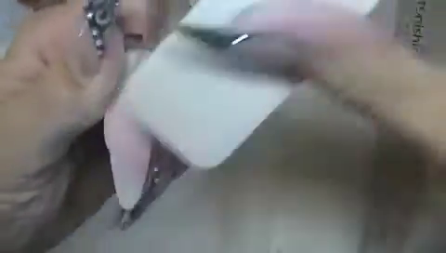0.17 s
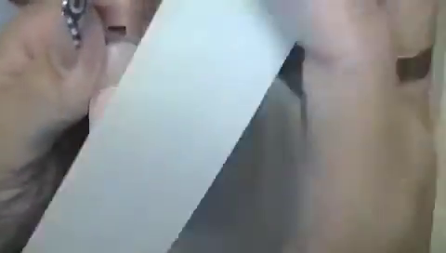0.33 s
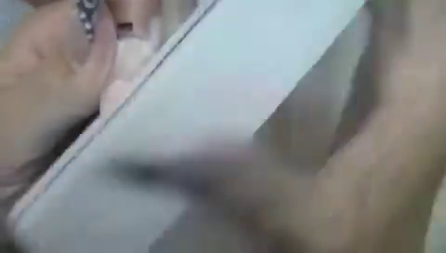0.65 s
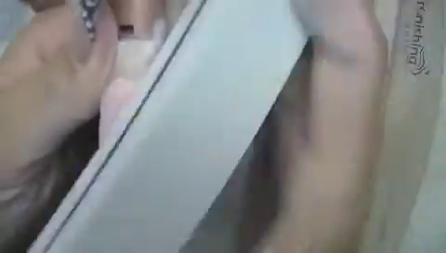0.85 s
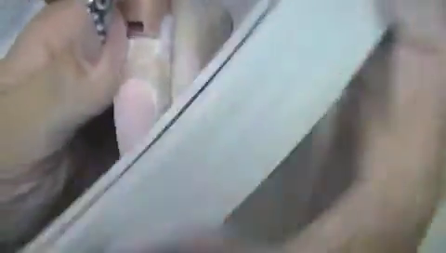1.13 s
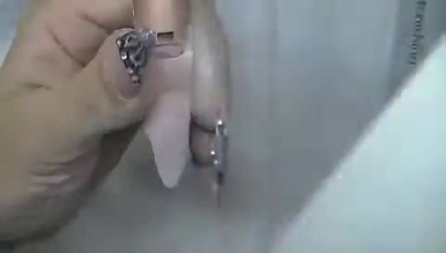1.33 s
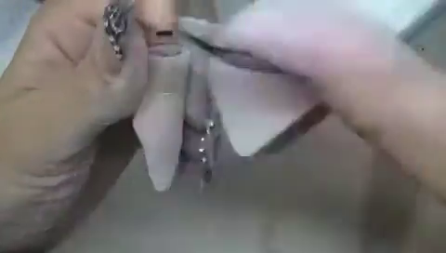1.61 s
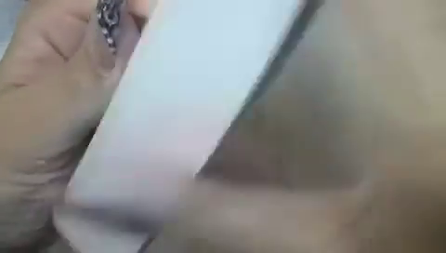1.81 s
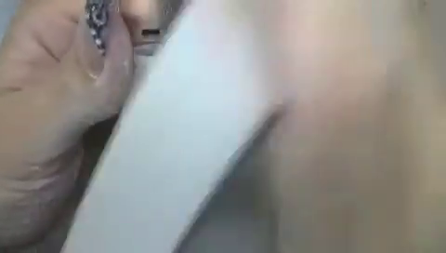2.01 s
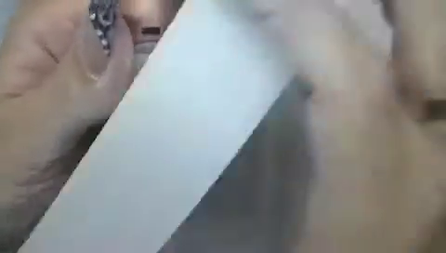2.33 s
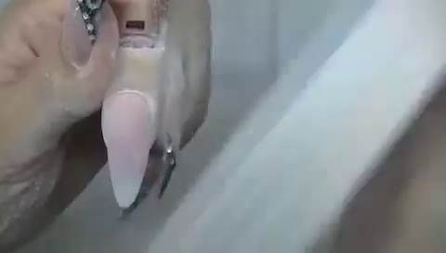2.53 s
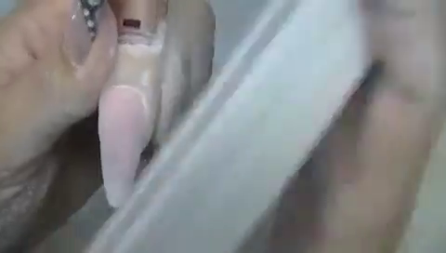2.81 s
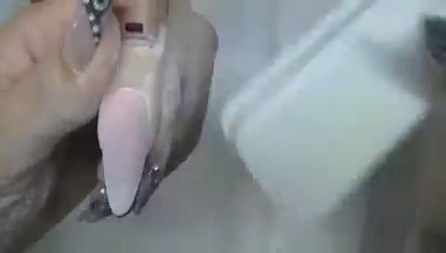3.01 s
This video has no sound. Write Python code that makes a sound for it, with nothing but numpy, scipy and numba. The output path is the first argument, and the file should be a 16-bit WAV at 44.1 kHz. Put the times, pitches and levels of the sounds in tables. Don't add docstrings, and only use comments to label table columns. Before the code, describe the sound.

A foam buffer block scratches a long acrylic nail, very close. Five hissy, gritty strokes of about 0.12 seconds start near 0.1, 0.4, 0.65, 0.9 and 1.15 s, the first strongest, with faint return drags. After a short pause and a tick at 1.5 s, six mostly lighter strokes follow until 3.0 s. Soft bumps mark landings; sharp clicks near 2.0 and 2.75 s. Quiet room hum.

```python
import sys
import numpy as np
from scipy import signal
from scipy.io import wavfile
from numba import njit

SR = 44100
rng = np.random.default_rng(int(sys.argv[2]) if len(sys.argv) > 2 else 0)


def decibels_to_gain(level_db):
    exponent = np.asarray(level_db, float) / 20
    return 10 ** exponent


def store_wav(level_fs):
    pcm = np.round(np.clip(np.atleast_2d(level_fs), -1, 1) * 32767)
    wavfile.write(sys.argv[1], SR, pcm.T.astype(np.int16))


N = 138915
RINGING_SHARE = 0.4


def rms_one(x):
    return x / np.sqrt(np.mean(x ** 2) + 1e-20)


def drift(rate_hz):
    r = np.exp(-2 * np.pi * rate_hz / SR)
    wander = signal.lfilter([1], [1, -2 * r, r * r], rng.standard_normal(N + SR))
    return rms_one(wander[SR:])


def butter(x, order, hz, kind="low"):
    return signal.sosfilt(signal.butter(order, hz, kind, fs=SR, output="sos"), x)


def resonance(x, hz, width_hz):
    r = np.exp(-np.pi * width_hz / SR)
    poles = [1, -2 * r * np.cos(2 * np.pi * hz / SR), r * r]
    return signal.lfilter(np.array([1, 0, -1]) * (1 - r * r) / 2, poles, x)


@njit
def moving_resonance(x, turn, r):
    y = np.zeros(len(x))
    for i in range(2, len(x)):
        y[i] = x[i] - x[i - 2] + 2 * r * np.cos(turn[i]) * y[i - 1] - r * r * y[i - 2]
    return y


def coloured(x, spectrum, patchy_db):
    hz, db = np.transpose(spectrum)
    edges_hz = 25 * 2 ** np.arange(0, 9.6, 1 / 3)
    out = 0
    for k, (low, high) in enumerate(zip(edges_hz, edges_hz[1:])):
        level_db = np.interp(np.log(np.sqrt(low * high)), np.log(hz), db)
        if level_db > -60:
            band = butter(x, 2, [low, high], "band")
            out = out + decibels_to_gain(level_db + patchy_db * drift(15.6)) * band * (-1) ** k
    return rms_one(out)


def scratch():
    grit_gain, nail_gain, block_hz, block_share = pressure()
    surface = grit_hiss(grit_gain) + block_share * block(block_hz)
    surface = surface / np.sqrt(1 + block_share ** 2)
    catch = grains(RINGING_SHARE)
    return grit_gain * surface + nail_gain * (nail_ring(catch) + finger(catch))


def pressure():
    # start/s, end/s, scratch at start/dB, scratch at end/dB, attack/s
    strokes = [(.115, .252, -20, -34, 0.033), (.382, .511, -29.5, -26, 0.0066),
               (.650, .800, -30, -33.5, 0.013), (.910, 1.030, -29, -25, 0.008),
               (1.169, 1.280, -29.5, -29, 0.0034), (1.531, 1.655, -28, -30, 0.00047),
               (1.803, 1.959, -30.5, -26, 0.0058), (2.090, 2.231, -32.5, -33.5, 0.0016),
               (2.369, 2.492, -35.5, -38, 0.0037), (2.638, 2.7495, -33.5, -28.5, 0.00143),
               (2.896, 3.0095, -34.5, -32.5, 0.00244)]
    # nail share at start/dB, at end/dB, block f at start/Hz, at end/Hz, block share/dB
    travel = [(-0.5, -10, 5760, 5100, 0), (3.5, -11.5, 5840, 4500, 0), (4, -13.5, 5970, 4360, 1),
              (5, -29, 5300, 5080, 0), (-0.5, -7.5, 6640, 4800, 0.5), (-8.5, -13, 4750, 3500, -5),
              (-11.5, -12.5, 4340, 4070, 0.5), (-20, -25, 6400, 4560, -7), (-8, -26.5, 4900, 5900, -7),
              (-3, -26, 6280, 4900, -4), (8, -26, 6160, 4650, -1)]
    # t/s, half width/s, scratch level/dB, nail level/dB
    surges = [(0.157, 0.015, -27.5, -21), (0.23, 0.0066, -28.5, -59), (0.433, 0.015, -22.5, -17.5),
              (.505, 0.004, -45, -52), (0.721, 0.04, -23.5, -36.5), (0.771, 0.0056, -26.5, -54),
              (0.955, 0.025, -26.5, -26), (1.024, 0.0032, -29, -59), (1.233, 0.023, -24.5, -45),
              (1.521, 0.0038, -41.5, -40), (1.644, 0.0051, -40, -53), (1.813, 0.0034, -30, -56),
              (1.953, 0.0027, -47, -28.5), (1.984, 0.013, -39, -39), (2.167, 0.034, -29.5, -53),
              (2.225, 0.0027, -31, -37), (2.438, 0.032, -29.5, -47), (2.69, 0.023, -36, -36.5),
              (2.765, 0.016, -37, -59), (2.937, 0.038, -31.5, -37.5), (3.008, 0.002, -30.5, -60),
              (3.015, 0.0048, -38, -64)]
    # start/s, level/dB, steady/s, fade to -60 dB/s (sign ignored)
    returns = [(0, -47.5, 0.011, 0.27), (.252, -45, 0.026, 0.3), (0.512, -39, 0.0048, 0.32),
               (.800, -45, 0.0089, 0.57), (1.031, -35.5, 0.0045, 0.14), (1.036, -46, 0.0091, 0.5),
               (1.282, -44, 0.061, -0.28), (1.34, -61, 0.027, -0.4), (1.657, -45.5, 0.015, 0.28),
               (2.001, -47.5, 0.0094, 0.34), (2.231, -47.5, 0.012, 0.45), (2.495, -52.5, 0.029, 0.25),
               (2.782, -56, 0.051, 0.1), (3.022, -52, 0.076, 0.2)]
    release_s, return_nail_db = 0.0016, -6.5
    return_block_hz, return_after_s = 4187, 0.026
    t = np.arange(N) / SR
    grit, nail = np.zeros(N), np.zeros(N)
    path = [(0, return_block_hz)]

    for (start, end, db0, db1, attack), (share0, share1, hz0, hz1, _) in zip(strokes, travel):
        along = np.clip((t - start) / (end - start), 0, 1)
        touch = np.clip((t - start) / attack, 0, 1) * decibels_to_gain(db0 + (db1 - db0) * along)
        touch = touch * np.exp(-np.maximum(t - end, 0) / release_s)
        grit = grit + touch ** 2
        nail = nail + (touch * decibels_to_gain(share0 + (share1 - share0) * along)) ** 2
        path += [(start - release_s, return_block_hz), (start, hz0)]
        path += [(end, hz1), (end + return_after_s, return_block_hz)]

    for s, half, grit_db, nail_db in surges:
        landing = max(row[0] for row in strokes if row[0] < s)
        bell = np.exp(-((t - s) / half) ** 2) * (t >= landing)
        grit = grit + bell * decibels_to_gain(2 * grit_db)
        nail = nail + bell * decibels_to_gain(2 * nail_db)

    for s, db, steady, fade in returns:
        drag = (t >= s) * decibels_to_gain(2 * db - 120 * np.maximum(t - s - steady, 0) / abs(fade))
        grit = grit + drag
        nail = nail + drag * decibels_to_gain(2 * return_nail_db)

    block_hz = np.interp(t, *np.transpose(path))
    turns_s = np.array(strokes)[:, :2].ravel()
    block_share_db = np.interp(t, turns_s, np.repeat(np.array(travel)[:, 4], 2))
    return np.sqrt(grit), np.sqrt(nail), block_hz, decibels_to_gain(block_share_db)


def grains(share=1):
    per_s, spread_db, chatter_db, chatter_hz = 13000, 2.7, 1.2, 150
    sizes = decibels_to_gain(spread_db * np.minimum(rng.exponential(1, N), 5)) * rng.choice([-1, 1], N)
    caught = rng.random(N) < share * per_s / SR
    return rms_one(sizes * caught * decibels_to_gain(chatter_db * drift(chatter_hz)))


def grit_hiss(grit_gain):
    # f/Hz, level/dB
    grit = [(1500, -10), (2500, -6), (3700, -0.5), (4700, 0), (7000, -4.5), (10300, -6.5), (14100, -21),
            (16200, -42.5)]
    reference_db, brightening, bright_from_hz = -78, 0.078, 11800
    hiss = coloured(grains(), grit, patchy_db=2.0)
    dull = butter(hiss, 2, bright_from_hz)
    bright = (hiss - dull) * (grit_gain / decibels_to_gain(reference_db)) ** brightening
    return rms_one(dull + bright)


def block(block_hz):
    # f/Hz, width/Hz, level/dB
    modes = [(4820, 170, -11.5), (5470, 51, -36), (5640, 65, -7.5), (6220, 100, -43)]
    hump_width_hz, mode_db, patchy_db = 1500, 6, 1.5
    catch = grains(RINGING_SHARE) * decibels_to_gain(patchy_db * drift(30.0))
    struck = catch + sum(decibels_to_gain(db + mode_db) * resonance(catch, hz, width) for hz, width, db in modes)
    turn, r = 2 * np.pi * block_hz / SR, np.exp(-np.pi * hump_width_hz / SR)
    return rms_one(moving_resonance(moving_resonance(struck, turn, r), turn, r))


def nail_ring(catch):
    # f/Hz, width/Hz, level/dB
    modes = [(1200, 150, -8), (1560, 80, -12), (2070, 230, -2), (2760, 200, -6), (3150, 160, 0),
             (3420, 260, -4)]
    spread, bed_db, gap_hz = 0.9, -14, 2400
    ring = 0
    for k, (hz, width_hz, db) in enumerate(modes):
        sign = (-1) ** (k + (hz > gap_hz))
        ring = ring + sign * decibels_to_gain(db + 2.0 * drift(14.5)) * resonance(catch, hz, spread * width_hz)
    bed = butter(catch[::-1], 3, [950, 3600], "band")
    return rms_one(rms_one(ring) + decibels_to_gain(bed_db) * rms_one(bed))


def finger(catch):
    hz, width_hz, level_db = 320, 220, -24
    return decibels_to_gain(level_db) * rms_one(resonance(resonance(catch, hz, width_hz), hz, width_hz))


def bites():
    # t/s, half width/s, level/dB, f/Hz
    bite_events = [(.145, 0.0037, -21, 2040), (0.153, 0.0012, -21, 3480), (.157, 0.0054, -22, 5760),
                   (.160, 0.0045, -18, 3250), (.176, 0.0025, -24, 3000), (.236, .003, -25, 4600),
                   (0.248, .003, -33, 4120), (.430, 0.009, -23.5, 2690), (0.444, 0.0015, -22, 3140),
                   (0.467, 0.0082, -25, 5750), (.507, .003, -34, 4450), (0.692, 0.012, -28, 2870),
                   (.772, 0.0017, -19.5, 4500), (.79, 0.0045, -35, 3250), (.925, 0.015, -30.5, 2980),
                   (1.025, 0.0031, -21, 4340), (1.022, 0.0027, -24, 5560), (.935, 0.0046, -28, 2070),
                   (0.966, 0.01, -27, 5700), (1.235, 0.0095, -26.5, 4190), (1.225, .006, -29, 6900),
                   (1.533, .0012, -31, 4800), (1.554, .0015, -30, 2900), (1.645, 0.0087, -28.5, 4300),
                   (1.812, 0.0043, -32.5, 2930), (1.985, 0.0043, -35, 4200), (1.954, 0.0024, -25, 3860),
                   (1.957, 0.00076, -26, 3300), (2.228, 0.0015, -27, 3170), (2.215, .008, -31, 4030),
                   (2.422, 0.0035, -31, 3220), (2.484, 0.0038, -31, 4000), (2.486, 0.0045, -34.5, 4700),
                   (2.68, 0.0093, -38.5, 2150), (2.757, .005, -36, 4100), (2.779, 0.0017, -40, 4020),
                   (2.82, 0.022, -53.5, 4900), (2.908, 0.0037, -35, 3250), (2.941, 0.0057, -41, 3130),
                   (2.94, 0.012, -39, 2230), (3.006, 0.0022, -30.5, 4300)]
    width_hz = 260
    out, t = np.zeros(N + SR), np.arange(-SR // 20, SR // 20) / SR
    for s, half, db, hz in bite_events:
        tone = rms_one(resonance(rng.standard_normal(len(t)), hz, width_hz))
        out[int((s + t[0]) * SR):][:len(t)] += decibels_to_gain(db) * tone * np.exp(-(t / half) ** 2 / 2)
    return out[:N]


def taps():
    # t/s, peak level/dB, scuff length/s, tip resonance f/Hz
    tap_events = [(0.893, -19, 0.011, 4400), (1.152, -19.5, 0.0045, 5300), (1.4125, -26.5, 0.0047, 1300),
                  (1.5016, -12.5, 0.0015, 3600), (1.5017, -23.5, 0.00086, 1510),
                  (1.978, -10.5, 0.00097, 3960), (1.9993, -3.5, 0.0009, 3900), (2.637, -16, 0.00067, 1510),
                  (2.746, -8, 0.0011, 4930), (2.782, -35.5, 0.0024, 4500), (2.895, -25, 0.00084, 1820),
                  (3.001, -19, 0.0022, 4400)]
    width_hz, softness, scuff_db = 800, 2.3, -12
    out, t = np.zeros(N + SR), np.arange(SR // 20) / SR
    for s, db, length, hz in tap_events:
        scuff = decibels_to_gain(scuff_db) * rng.standard_normal(len(t)) * np.exp(-t / length)
        hit = decibels_to_gain(db + 10.5) * ((t == 0) + scuff)
        tick = resonance(hit, hz, width_hz) + 0.2 * hit
        out[int(s * SR):][:len(t)] += butter(tick, 2, softness * hz)
    return out[:N]


def bumps():
    # t/s, peak level/dB, f/Hz
    bump_events = [(0.122, -25.5, 300), (0.16, -36, 93), (0.251, -40, 93), (.382, -21, 298),
                   (.503, -27.5, 290), (.650, -19.5, 300), (.893, -25, 300), (1.152, -29.5, 243),
                   (1.4121, -33.5, 300), (1.532, -28, 218), (1.656, -40, 76.5), (1.806, -33, 298),
                   (1.951, -29.5, 116), (1.994, -37, 75), (2.091, -28.5, 262), (2.222, -28.5, 148),
                   (2.370, -26.5, 295), (2.488, -37, 91), (2.638, -17, 386), (2.746, -26.5, 350),
                   (2.762, -35.5, 139), (2.896, -21.5, 296), (3.009, -29.5, 240)]
    cycles, low_hz, edge_hz = 2.02, 54, 18000
    out, t = np.zeros(N + SR), np.arange(SR // 10) / SR
    for s, db, hz in bump_events:
        swing = np.cos(2 * np.pi * hz * t - 0.8) * decibels_to_gain(-60 * (t * hz / cycles) ** 2)
        out[int(s * SR):][:len(t)] -= decibels_to_gain(db + 4) * swing
    return butter(out[:N], 2, [low_hz, edge_hz], "band")


def capsule_width(x):
    level_db, swing_db, from_hz, to_hz, decay_s = -21, 3, 5500, 15000, 0.002
    t = np.arange(SR // 40) / SR
    smear = butter(rng.standard_normal(len(t)) * np.exp(-t / decay_s), 2, [from_hz, to_hz], "band")
    smear = smear / np.sqrt(np.sum(smear ** 2))
    return decibels_to_gain(level_db + swing_db * drift(12.0)) * signal.fftconvolve(x, smear)[:N]


def room(x):
    t60_s, wall_cut_hz, level_db = 0.32, 2900, -32
    t = np.arange(SR // 2) / SR
    tail = rng.standard_normal((2, len(t))) * decibels_to_gain(-60 * t / t60_s) * (t > 0.004)
    tail = butter(tail, 1, wall_cut_hz)
    tail = tail / np.sqrt(np.sum(tail ** 2, axis=1, keepdims=True))
    return decibels_to_gain(level_db) * signal.fftconvolve(x[None], tail, axes=1)[:, :N]


def hum():
    # f/Hz, level/dB
    tone = [(15, -50), (30, -26), (206, -0.5), (439, 5), (545, 2.5), (1480, -5.5), (4740, -13),
            (10400, -24), (16000, -73)]
    # f/Hz, width/Hz, level/dB
    peaks = [(208, 60, -48.5), (443.7, 19.6, -51.5)]
    level_db = -50
    out = decibels_to_gain(level_db) * coloured(rng.standard_normal(N), tone, patchy_db=3.5)
    for hz, width_hz, db in peaks:
        out = out + decibels_to_gain(db) * rms_one(resonance(rng.standard_normal(N), hz, width_hz))
    return out


def scene():
    side_hum_db = -16.5
    near = scratch() + bumps() + taps() + bites()
    common, apart = room(near)
    mid = near + hum() + common
    side = apart + capsule_width(near) + decibels_to_gain(side_hum_db) * hum()
    return mid + side * [[1], [-1]]


def low_pass(x):
    return signal.sosfilt(signal.butter(12, 16480, fs=SR, output="sos"), x)


def record(dry):
    cutoff_hz = 16450
    cut = signal.sosfilt(signal.cheby2(12, 70, cutoff_hz, fs=SR, output="sos"), dry)
    return low_pass(cut)


dry = scene()
out = record(dry)
store_wav(out)
```